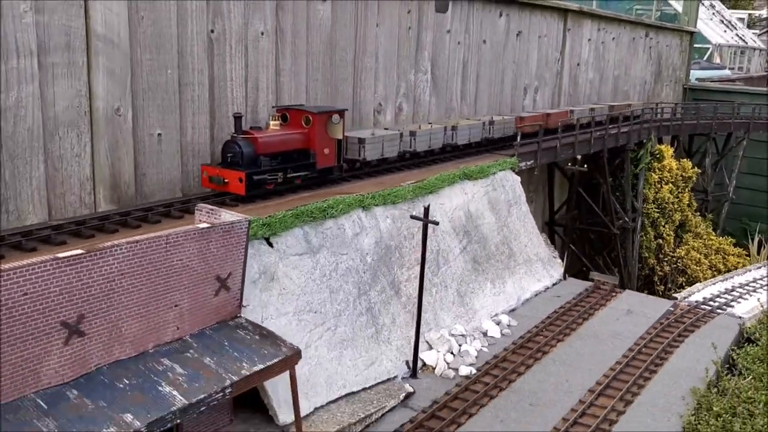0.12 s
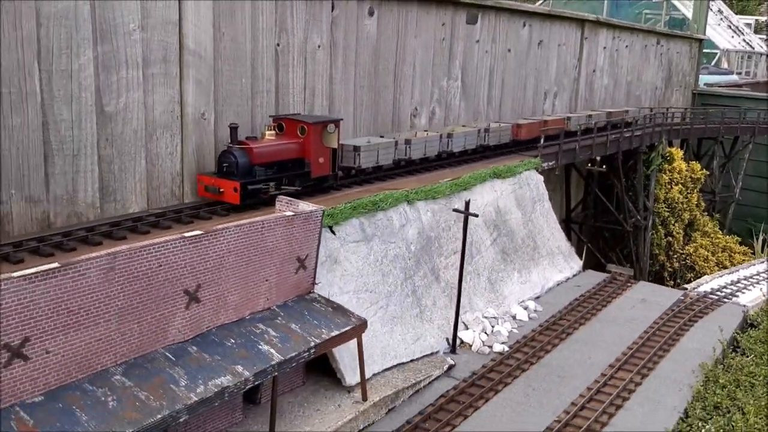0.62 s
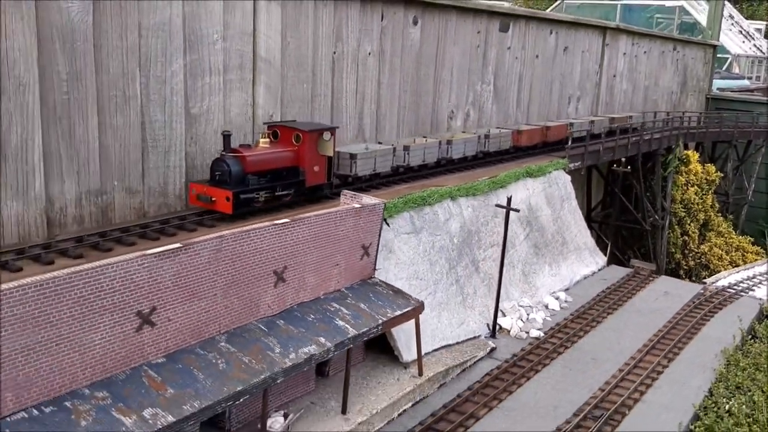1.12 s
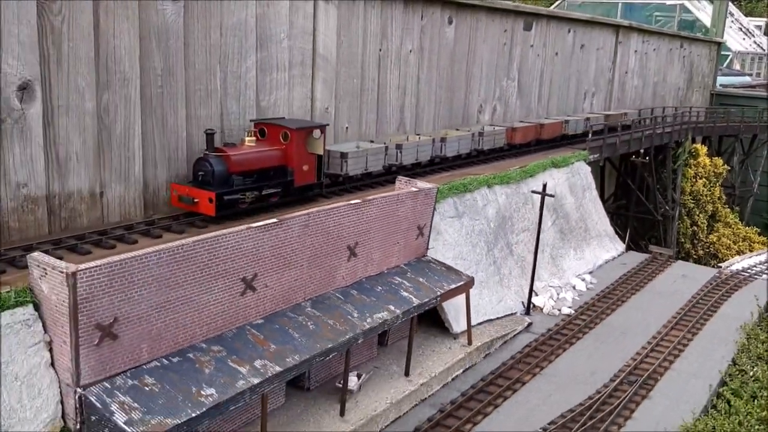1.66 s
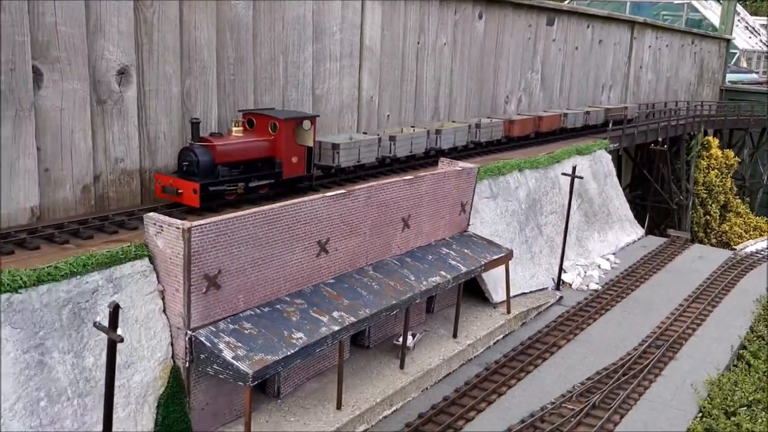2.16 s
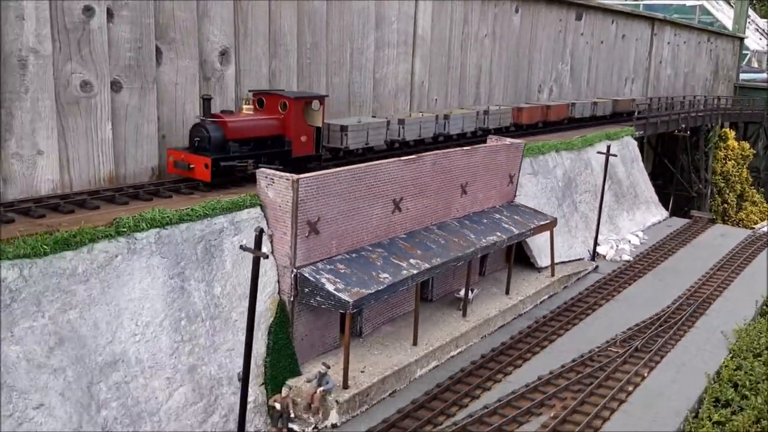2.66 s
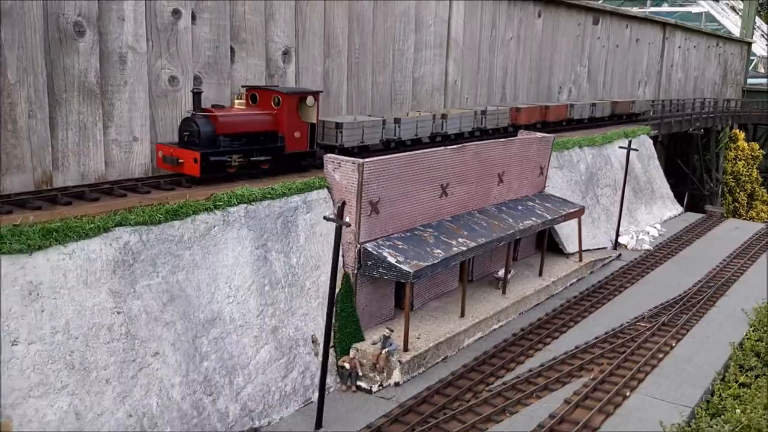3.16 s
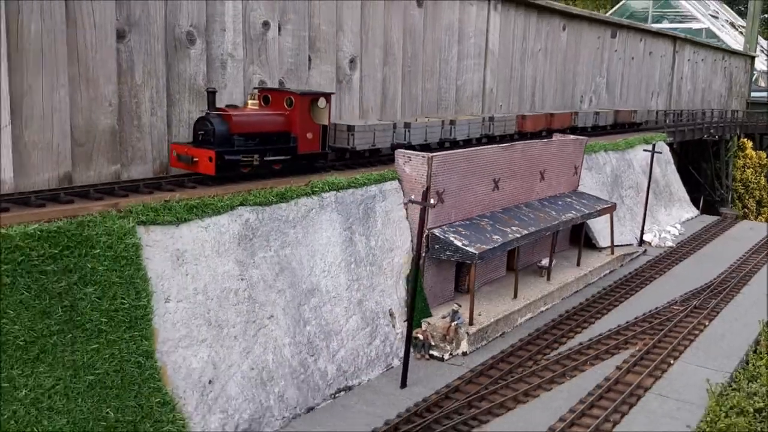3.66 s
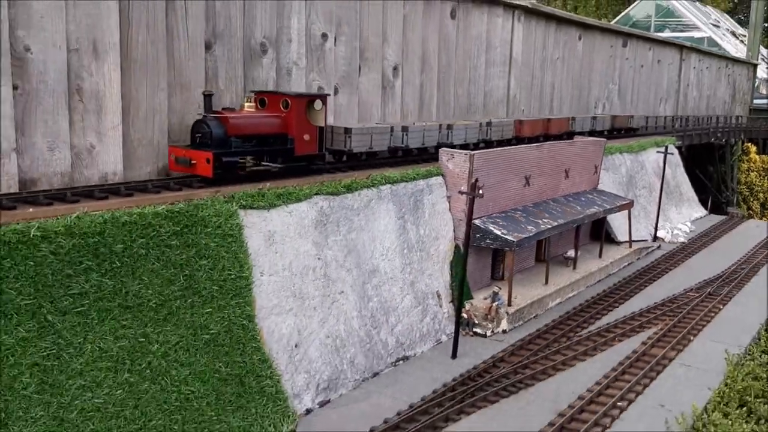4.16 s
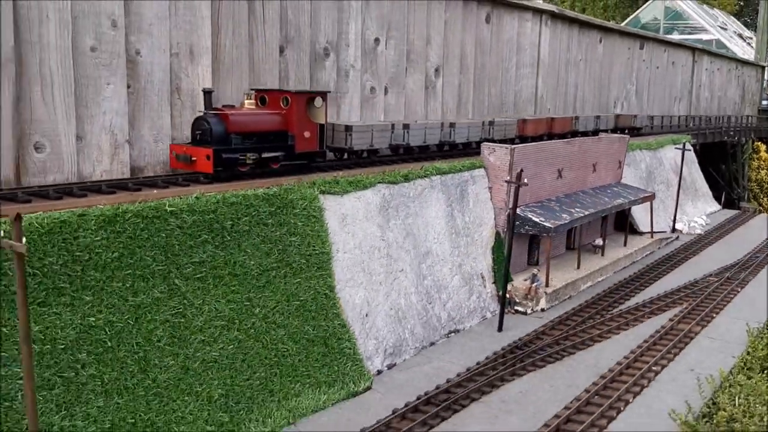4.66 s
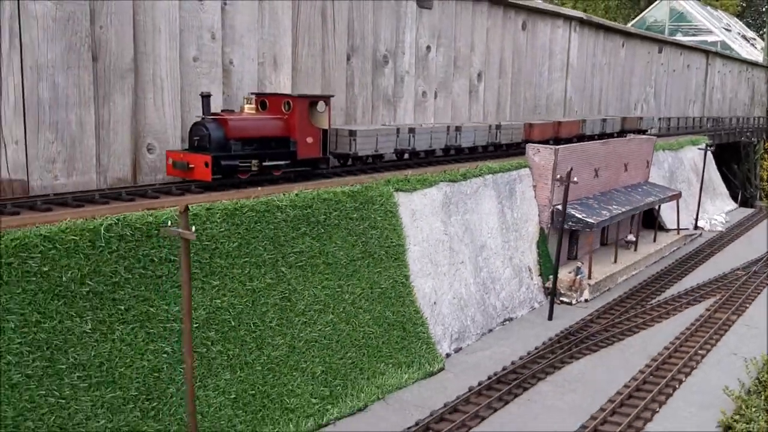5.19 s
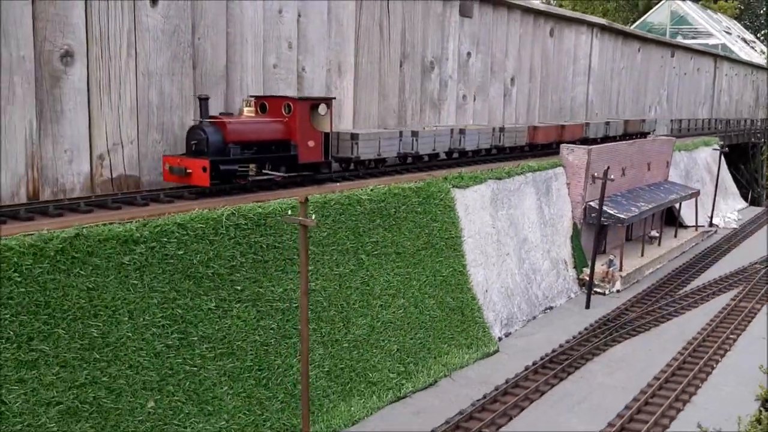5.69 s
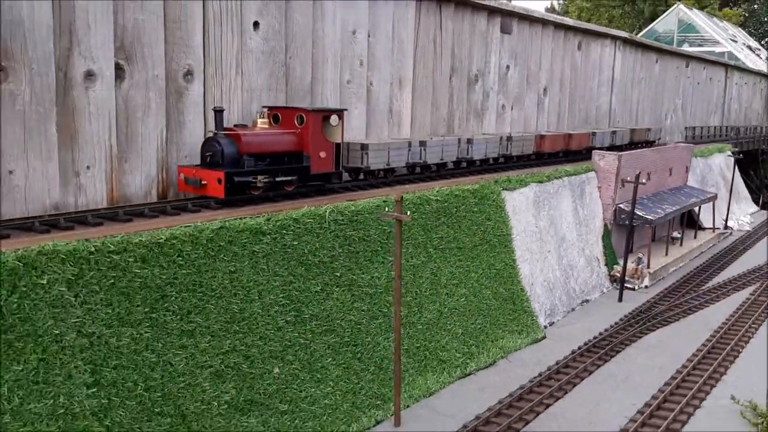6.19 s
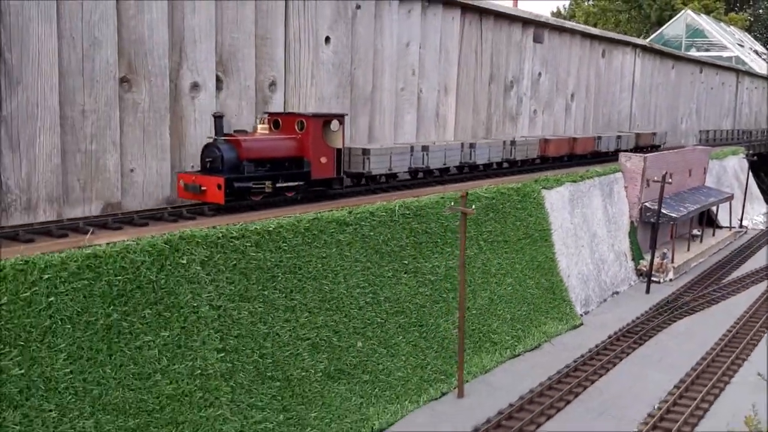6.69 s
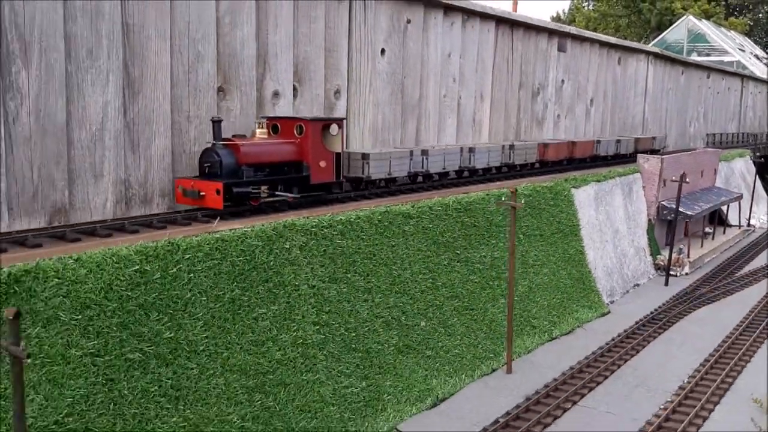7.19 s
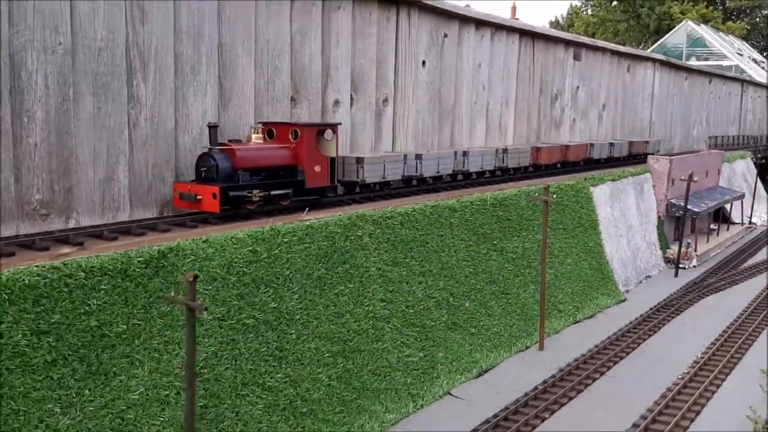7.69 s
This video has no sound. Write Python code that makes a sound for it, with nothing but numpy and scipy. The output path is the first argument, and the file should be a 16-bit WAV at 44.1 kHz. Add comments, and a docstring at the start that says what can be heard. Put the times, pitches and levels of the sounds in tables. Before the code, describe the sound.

Close outdoor stereo sound from a hand-held camera following a miniature live-steam engine along a fence. From 0 to 7.8 seconds a bright, very high steam and gas hiss stays nearly constant, slightly grainy, with subtle sweeping streaks and brief dips, notably near 6 and 7.5. Rapid soft exhaust puffs, about thirteen per second, flutter beneath it, a little stronger around 2, 3.6 and 5.5. A faint hollow burner roar and low wagon rumble continue underneath. A distant vehicle's tyre roar swells near 0.9, falls slightly in pitch and fades by about 2.7. Soft low thumps over rail joints cluster at 1.4 to 2.3, then come singly or in pairs, clearer near 4.9, 5.7 and 6.2. Light wind bumps appear around 3 to 4.4; from 6.3 deep uneven buffeting shifts between left and right, peaking around 6.9 to 7.3. It ends mid-run.

```python
"""Garden railway: a small live-steam locomotive runs along the line, followed by a hand-held camera.
Gas jet and leaking steam hiss (banded noise, streaked by echoes off a fence); the flame roars in the flue
(noise through tube modes); exhaust beats puff four to a wheel turn (noise pulses ringing the chimney).
Wagons rumble and thump over rail joints (noise, decaying sines), a far vehicle passes (noise on a falling
pitch), and wind buffets the two microphone ports (low noise, short low-pitched gusts)."""
import sys
import numpy as np
from scipy import signal
from scipy.fft import rfft, irfft, next_fast_len
from scipy.io import wavfile
from scipy.ndimage import uniform_filter1d, map_coordinates

SR = 44100
rng = np.random.default_rng(int(sys.argv[2]) if len(sys.argv) > 2 else 0)


def field_ratio(decibels):
    """Amplitude ratio for a level in dB (20 dB per decade); scalars and array-likes work."""
    return 10 ** (np.asarray(decibels, dtype=float) / 20)


def log_audio(samples):
    """Write samples as a 16-bit WAV file to the path given in sys.argv[1]."""
    # one column per channel
    frames = np.atleast_2d(samples).T
    # limit to full scale, then quantise
    limited = np.clip(frames, -1, 1)
    pcm = np.round(limited * 32767).astype(np.int16)
    wavfile.write(sys.argv[1], SR, pcm)


N = 345303  # samples


def unit(x):
    """Scaled to rms 1."""
    return x / np.sqrt(np.mean(x ** 2) + 1e-20)


def along(points, hz):
    """Every column after the frequency, read on a log axis."""
    f, *cols = np.transpose(points)
    return np.squeeze([np.interp(np.log(hz + 1), np.log(f + 1), c) for c in cols])


def curves(rows):
    """One value per sample for each column after the time."""
    s, *cols = np.transpose(rows)
    return [np.interp(np.arange(N) / SR, s, c) for c in cols]


def wobble(knots_per_s):
    """A smooth random curve through normal random knots."""
    knots = rng.standard_normal(int(N * knots_per_s / SR) + 4)
    return map_coordinates(knots, [np.arange(N) * knots_per_s / SR])


def patches(shape, wide, long):
    """A random field of rms 1, smooth over wide rows and long columns."""
    field = uniform_filter1d(rng.standard_normal(shape), wide, -2)
    return unit(uniform_filter1d(field, long, -1))


def filtered(x, response):
    """x times a complex response of frequency."""
    m = next_fast_len(N + 8192)
    return irfft(rfft(x, m) * response(np.fft.rfftfreq(m, 1 / SR)), m)[..., :N]


def ring(noise, table, sharpness):
    """Noise through a pipe's resonances, alternate in sign; sharpness deepens the valleys between them."""
    def response(f):
        total = 0
        for k, (centre, width, left_db, right_db) in enumerate(table):
            mode = 1j * f * width / (centre * centre - f * f + 1j * f * width)
            total = total + (-1) ** k * field_ratio([[left_db], [right_db]]) * mode
        return total * np.abs(total) ** sharpness
    return unit(filtered(noise, response))


# Likeness of the two ports. Each row: frequency in Hz, likeness 0 to 1.
PORT_LIKENESS = [(50, 0.9), (200, 0.84), (500, 0.76), (1050, 0.27), (1550, 0.52), (1900, 0.97), (2500, 0.8),
                 (2850, 0.16), (3300, 0.29), (3800, 0.74), (4800, 0.58), (5600, 0.53), (7500, 0.2),
                 (10000, 0.15), (15000, 0)]
# Phase lead of the left port. Each row: frequency in Hz, lead in radians.
LEFT_LEAD = [(30, -0.5), (520, 0.65), (1000, 1), (1640, 2), (1980, 1), (2500, 0.93), (3530, 3.5), (5600, 4),
             (8790, 6.5), (10900, 6), (13000, 7.5), (16000, 10)]


def air(patchy_db, wide=8, long=12):
    """White noise at two ports: partly alike, offset in phase, in time-frequency patches of random gain."""
    z = signal.stft(rng.standard_normal((2, N)), nperseg=512)[2]
    gain_db = patchy_db * patches(z.shape[1:], round(wide), round(long))
    pair = signal.istft(z * field_ratio(gain_db), nperseg=512)[1][:, :N]

    def shares(hz):
        angle = np.arccos(np.clip(along(PORT_LIKENESS, hz), 0, 1)) / 2
        return np.array([np.cos(angle), np.sin(angle)])
    mid, side = filtered(pair, shares)
    ports = np.array([mid + side, mid - side])
    return filtered(ports, lambda hz: np.exp(.5j * along(LEFT_LEAD, hz) * [[1], [-1]]))


# Fence planks passed, one echo phase turn each. Each row: time in seconds, left count, right count.
PLANK_COUNT = [(0, 0.8, 0.6), (.29, 2.06, 1.71), (.73, 3.79, 2.87), (1.16, 5.73, 4.25), (1.6, 7.73, 6.36),
               (2.03, 9.78, 8.49), (2.47, 11.41, 10.4), (2.9, 13.32, 12.28), (3.34, 15.56, 14.11),
               (3.77, 17.93, 15.86), (4.21, 19.76, 17.51), (4.64, 21.41, 19.18), (5.08, 23.25, 20.94),
               (5.51, 24.98, 22.51), (5.95, 26.8, 24.32), (6.39, 28.65, 26.14), (6.82, 30.58, 28.26),
               (7.26, 32.44, 30.14), (7.83, 34.85, 32.55)]
ECHO_DELAY_S, ECHO_HZ = [[.0003], [.00045]], 13700  # left and right delay; where the count is read
ECHO_SHARE = .26  # echo over direct hiss


def fence(x):
    """A close echo turns in phase plank by plank: bright and dull streaks sweep down the hiss."""
    f, t, z = signal.stft(x, SR, nperseg=256)
    s, *counts = np.transpose(PLANK_COUNT)
    planks = np.array([np.interp(t, s, c) for c in counts])[:, None]
    turns = planks + (ECHO_DELAY_S * (f - ECHO_HZ))[..., None]
    comb = np.abs(1 + ECHO_SHARE * np.exp(2j * np.pi * turns))
    return signal.istft(z * comb, SR, nperseg=256)[1][:, :N]


# Hiss spectrum at each port. Each row: frequency in Hz, left in dB, right in dB.
JET_COLOUR = [(2880, -26, -18), (3650, -16, -14.5), (4200, -14.5, -16), (5100, -13, -15.5),
              (5700, -15, -10.5), (6530, -14.5, -18), (7400, -11, -15.5), (8090, -13.5, -17.5),
              (8220, -23.5, -22), (9190, -10.5, -20), (10370, -9.5, -11), (11280, -6.5, -11),
              (12100, -4, -7), (12800, -2, -1), (13600, -0.5, 0.5), (14600, -1.5, -2), (15200, -3, -2.5),
              (15700, -3, -1)]
# Brief flares and lulls. Each row: centre in seconds, swing in dB, half width in seconds.
JET_FLARES = [(.34, 2.5, 0.019), (1.26, 0.5, 0.016), (1.49, -2, 0.0096), (2.87, 1.5, 0.046),
              (3.7, -3, 0.032), (3.98, 2, 0.027), (4.11, -3, 0.036), (4.62, -3, 0.0086), (4.94, 1, 0.025),
              (5.67, -2, 0.022), (5.79, 4.5, 0.013), (5.95, -4, 0.038), (6.08, -1, 0.032),
              (6.14, -5, 0.012), (7.42, 1.5, 0.065), (7.52, -8, 0.021), (7.6, 1, 0.032)]
# Jet's duller side toward the camera. Each row: time in seconds, low band change in dB.
JET_FACING = [(0, -0.5), (.45, -5), (.8, -1), (1.7, 1.5), (2.2, 1), (2.7, -2.5), (3.0, 0.5), (3.9, -1.5),
              (5, -1), (5.7, 1), (6.1, -1.5), (6.8, 0.5), (7.83, -1.5)]
JET_DB = -25  # steady top band
MIDDLE_DB, LOW_DB = -12.5, -13.5  # under the top band
MIDDLE_FOLLOWS, LOW_FOLLOWS = 1, 0.15  # share of the flares
MIDDLE_TURNS = 0.14  # share of the facing


def hiss():
    """Jet turbulence noise; its three bands swell apart as engine and camera move."""
    t, facing_db = np.arange(N) / SR, curves(JET_FACING)[0]
    swing_db = sum(db * np.exp(-.5 * ((t - s) / width_s) ** 2) for s, db, width_s in JET_FLARES)
    streaky = fence(air(patchy_db=1.31, wide=14.1, long=6))
    jet = filtered(streaky, lambda hz: field_ratio(along(JET_COLOUR, hz)) * (hz > 2600))

    def above(hz, edge_hz):
        return .5 + .5 * np.tanh((hz - edge_hz) / 500)
    low = filtered(jet, lambda hz: 1 - above(hz, 8600))
    top = filtered(jet, lambda hz: above(hz, 12000))
    middle = jet - low - top
    top_db = swing_db + 0.76 * wobble(22)
    middle_db = MIDDLE_DB + MIDDLE_FOLLOWS * swing_db + MIDDLE_TURNS * facing_db + 0.77 * wobble(9)
    low_db = LOW_DB + LOW_FOLLOWS * swing_db + facing_db + 1.33 * wobble(9)
    bands = field_ratio(top_db) * unit(top) + field_ratio(middle_db) * unit(middle) + field_ratio(low_db) * unit(low)
    return field_ratio(JET_DB + 0.66 * wobble(17)) * bands


# Flame strength. Each row: time in seconds, level in dB.
FLAME_LEVEL = [(0.0, -55.5), (0.41, -56), (0.48, -55.5), (2.97, -55), (7.81, -53.5), (7.83, -54)]
# Flue tube modes, low then high. Each row: centre in Hz, width in Hz, left in dB, right in dB.
LOW_FLUE_MODES = [(507, 165, -3.5, -4.5), (743, 150, -3, -4.5), (994, 112, -1.5, -0.5)]
HIGH_FLUE_MODES = [(1555, 133, 1.5, 2.5), (2036, 139, -2.5, -4), (2446, 390, -5.5, -7.5),
                   (2990, 180, -7.5, -3.5)]
LOW_FLUE_DB, HIGH_FLUE_DB = 6, 7  # over the flame level


def flame():
    """Flame turbulence excites the flue tube modes; the low ones hold the mean level."""
    level_db, = curves(FLAME_LEVEL)
    low = ring(air(patchy_db=1.94, wide=3, long=8), LOW_FLUE_MODES, 0.087)
    high = ring(air(patchy_db=0.87, wide=3, long=8), HIGH_FLUE_MODES, 0.15)
    return field_ratio(level_db.mean() + LOW_FLUE_DB) * low + field_ratio(level_db + HIGH_FLUE_DB) * high


# Wheel motion. Each row: time in seconds, exhaust beats counted so far.
WHEEL_BEATS = [(0, .35), (0.398, 5.56), (0.951, 12.94), (1.502, 20.97), (2.0, 27.98), (2.5, 34.93),
               (3.4, 46.76), (4.201, 57.01), (4.799, 64.86), (5.397, 72.92), (7.1, 95.54), (7.55, 101.42),
               (7.83, 105.17)]
# Four strokes of a wheel turn. Each row: delay in seconds, chimney modes in dB, overtones in dB.
STROKE_OFFSETS = [(-0.002, 2, 7), (-0.002, 0, 6.5), (-0.002, -0.5, 5.5), (-0.002, 2, 6.5)]
# Engine effort; lower chimney mode strong at the start, faint until 2.2 s, then back.
# Each row: time in seconds, beat level in dB, lower chimney mode over the beat in dB.
ENGINE_EFFORT = [(0, -48.5, 6), (1, -46, -17), (2.2, -43, -26), (2.7, -48, -0.5), (3.6, -41.5, -7),
                 (4.4, -45, -11), (5.5, -41.5, -6), (6.6, -44, -3.5), (7.83, -42, -7)]
# Chimney modes, lower chimney mode, overtones.
# Each row: centre in Hz, width in Hz, left in dB, right in dB.
CHIMNEY_MODES = [(2618, 340, -2, 2), (3010, 415, -6, 0)]
LOWER_CHIMNEY_MODE = [(2300, 190, 5.5, 3)]
OVERTONE_MODES = [(1533, 146, 1.6, 3), (4160, 1010, 2.6, -2.5), (5070, 610, 5.2, 6), (10980, 790, 7.8, 0.5)]
CHIMNEY_TRIM_DB, OVERTONE_TRIM_DB = -1.5, 1.0
OVERTONES_FOLLOW = 0.39  # share of the effort's swings
BEAT_SCATTER_S, BEAT_SCATTER_DB = 0.0025, 1.6
BETWEEN_DB = -13.5  # steam between beats, under their peak
BEATS_PER_S = 13.3  # mean


def exhaust():
    """Each beat is a soft puff of steam that rings the chimney, over steam that keeps blowing."""
    when, counted = np.transpose(WHEEL_BEATS)
    beat = np.arange(np.ceil(counted[0]), counted[-1]).astype(int)
    late_s, stroke_db, over_db = np.array(STROKE_OFFSETS)[beat % len(STROKE_OFFSETS)].T
    chance = rng.standard_normal((len(beat), 4))
    beat_s = np.interp(beat, counted, when) + late_s + BEAT_SCATTER_S * chance[:, 0]
    at = np.clip(beat_s * SR, 0, N - 1).astype(int)
    effort_db, lower_db = [c[at] for c in curves(ENGINE_EFFORT)]
    mean_db = effort_db.mean()
    first_db = effort_db + stroke_db
    over_db = over_db + mean_db + OVERTONES_FOLLOW * (effort_db - mean_db)
    sizes = np.zeros((3, N))
    sizes[:, at] = field_ratio([first_db, first_db + lower_db, over_db] + BEAT_SCATTER_DB * chance[:, 1:].T)
    t = np.arange(-2000, 2001) / SR
    puff = np.exp(-.5 * (t / np.where(t < 0, .008, .007)) ** 2)
    puffs = signal.fftconvolve(sizes, puff[None], "same", axes=1)
    between = field_ratio(BETWEEN_DB) * uniform_filter1d(sizes, SR // 4, axis=1) * SR / BEATS_PER_S
    first, lower, over = puffs + between
    chimney, lower_chimney, overtones = [ring(air(patchy_db=0.5), table, 0.069)
                                         for table in (CHIMNEY_MODES, LOWER_CHIMNEY_MODE, OVERTONE_MODES)]
    body = field_ratio(CHIMNEY_TRIM_DB) * (first * chimney + lower * lower_chimney)
    return body + field_ratio(OVERTONE_TRIM_DB) * over * overtones


# Rolling spectrum. Each row: frequency in Hz, relative density in dB per Hz.
ROLLING_COLOUR = [(35, -48), (60, -10.5), (189, 1), (277, -3), (406, -0.5), (564, -17.5), (1020, -8),
                  (1400, -3.5), (1820, -55), (3080, -120)]
# Wheels over rail joints. Each row: start in seconds, level in dB before trim and attack, deck pitch in Hz.
JOINT_THUMPS = [(1.357, -31, 109), (1.83, -28, 137), (1.919, -31, 173), (2.062, -27.5, 141),
                (2.25, -25.5, 165.8), (2.782, -34, 199), (3.566, -37, 193), (4.646, -32, 132),
                (4.705, -36, 129), (4.905, -26.5, 128), (5.321, -30, 139), (5.577, -32, 156),
                (5.677, -26.5, 133), (6.214, -28, 125), (6.647, -32.5, 157), (7.807, -39, 128)]
ROLLING_DB, THUMP_TRIM_DB = -50, -0.5
THUMP_T60_S, THUMP_ATTACK_S = 0.075, 0.014


def wagons():
    """Wheels rumble on the rails; the raised track deck thumps at each joint as a decaying sine."""
    rumble = unit(filtered(air(patchy_db=2.0), lambda hz: field_ratio(along(ROLLING_COLOUR, hz))))
    rolling = field_ratio(ROLLING_DB + 1.4 * wobble(11)) * rumble
    deck, t = np.zeros(N + SR), np.arange(SR // 4) / SR
    for s, db, hz in JOINT_THUMPS:
        decay = field_ratio(db + THUMP_TRIM_DB - 60 * t / THUMP_T60_S)
        attack = 1 - np.exp(-t / THUMP_ATTACK_S)
        deck[round(s * SR):][:len(t)] += decay * attack * np.sin(2 * np.pi * hz * t)
    return rolling + deck[:N]


# Far vehicle's tyre roar. Each row: time in seconds, pitch in Hz, level in dB.
TYRE_ROAR = [(0, 1120, -56), (.45, 1111, -54), (.6, 1049, -48.5), (.9, 990, -46.5), (1.2, 953, -48),
             (1.6, 916, -55.5), (2.1, 910, -51), (2.7, 880, -61), (3.3, 877, -74), (7.83, 885, -62)]
TRAFFIC_LEFT_DB = 2  # added left, taken off right


def traffic():
    """Tyre roar: slow noise carried on a pitch that sinks as the vehicle passes."""
    hz, db = curves(TYRE_ROAR)
    slow = filtered(rng.standard_normal((2, 2, N)), lambda f: 1 / (1 + (f / 90) ** 2))
    phase = 2 * np.pi * np.cumsum(hz) / SR
    roar = unit(slow[0] * np.cos(phase) + slow[1] * np.sin(phase))
    return field_ratio(db + TRAFFIC_LEFT_DB * np.array([[1], [-1]])) * roar


# Breeze strength. Each row: time in seconds, level in dB.
BREEZE = [(0, -75), (.6, -66), (1, -72), (2.6, -80), (3.1, -55), (4.4, -62), (4.8, -64), (5.9, -62),
          (6.1, -66), (6.3, -61), (6.7, -51), (6.9, -46.5), (7.3, -50), (7.5, -58), (7.83, -54)]
# Buffeting spectrum. Each row: frequency in Hz, relative density in dB per Hz.
BUFFET_COLOUR = [(12, -48), (24, -14), (44, -5), (65, -7), (108, -14), (190, -15.5), (250, -30), (320, -54),
                 (550, -120)]
# Gusts at the ports. Each row: time in seconds, level in dB before trim, pitch in Hz,
# left over right in dB before the limit.
PORT_GUSTS = [(0.519, -53, 108, -2), (0.799, -57, 75.4, 4.5), (1.129, -47, 107.9, 1),
              (2.089, -53, 78.6, -10), (2.509, -67, 77.9, 14.5), (2.919, -50, 80.7, 4.0),
              (3.118, -53, 110, 11.5), (3.289, -46, 45.4, 33.5), (3.659, -45, 61, 14.0),
              (3.779, -48.5, 92, 21), (4.249, -53, 68, 24.0), (4.389, -48, 43, 2), (5.279, -50, 108, -4),
              (6.319, -44.5, 72.7, 4), (6.468, -48, 91.5, 3), (6.569, -50, 59.2, -1.5),
              (6.82, -43, 67.3, 19), (6.869, -38, 64.6, -16), (7.058, -41, 73, 21), (7.129, -40, 48.4, 11),
              (7.179, -37, 67, -8), (7.249, -45, 81.5, -12), (7.329, -43, 83, -13),
              (7.509, -44.5, 86.1, -2), (7.659, -45, 91.5, 2), (7.799, -46, 63.6, -18.5)]
GUST_TRIM_DB, GUST_PAN_LIMIT_DB = -2.5, 15
GUST_DELAY_S, GUST_HALF_WIDTH_S = 0.012, 0.015


def wind():
    """Turbulence buffets each port in lumps; single gusts push the ports unequally for a few cycles."""
    buffeting = filtered(rng.standard_normal((2, N)), lambda hz: field_ratio(along(BUFFET_COLOUR, hz)))
    lumps = field_ratio(0.9 * wobble(8.7) + 3.3 * np.array([wobble(9.6), wobble(11)]))
    breeze = field_ratio(curves(BREEZE)[0] + 2.4 * wobble(11)) * unit(lumps * buffeting)
    t, strikes = np.arange(N) / SR, np.zeros((2, N))
    for s, db, hz, pan_db in PORT_GUSTS:
        pan_db = np.clip(pan_db, -GUST_PAN_LIMIT_DB, GUST_PAN_LIMIT_DB)
        level = field_ratio(db + GUST_TRIM_DB + pan_db * np.array([[.5], [-.5]]))
        swell = np.exp(-.5 * ((t - s - GUST_DELAY_S) / GUST_HALF_WIDTH_S) ** 2)
        strikes += level * swell * np.cos(2 * np.pi * hz * (t - s) + rng.uniform(0, 2 * np.pi))
    return breeze + strikes


def scene():
    """All sources at the two ports."""
    return hiss() + flame() + exhaust() + wagons() + traffic() + wind()


# Cancellations in the camera's housing. Each row: Hz ahead, Hz abreast, width in Hz, left depth ahead in dB,
# right depth ahead in dB, ratio of depth abreast to ahead.
HOUSING_NOTCHES = [(597, 763, 55, 7, 5, 0.26), (1270, 1337, 88, 1.5, 2, 0.9), (1930, 1882, 89, 2, 3, 3.95),
                   (2223, 2126, 58, 6.5, 14, 0.27), (2794, 2783, 59, 5.5, 10.5, 1.1),
                   (3710, 3620, 59, 0.5, 11.5, 0.87), (5950, 6800, 140, 1, -2, 1.1),
                   (8540, 8830, 254, 3, 20, 0.38), (10400, 11200, 110, 2, 7, 0.92),
                   (11560, 11040, 250, 0, 8, 0.37), (13300, 13000, 600, 4.5, 2.5, 0.1),
                   (15000, 14600, 190, -2, 3, 2.1)]
# Engine's bearing. Each row: time in seconds, 0 ahead of the camera to 1 abreast.
ENGINE_BEARING = [(0, 0.05), (2.2, 0.12), (2.5, 0.59), (5, 0.85), (7.83, 0.94)]
# Left treble hollow that wanders as the camera turns. Each row: time in seconds, centre in Hz, depth in dB.
LEFT_HOLLOW = [(0, 15200, 3), (.9, 14100, 4), (1.8, 15450, 6), (2.8, 14400, 7), (3.9, 14900, 3.5),
               (5, 14700, 12), (6, 14600, 5), (7.2, 15000, 5), (7.83, 15200, 1)]
HOLLOW_WIDTH_HZ = 460
WAVER = 0.008  # share by which the hand-held camera shifts the notches
RIPPLE_DB = 1.2


def housing(x):
    """Notches move with the engine's bearing; narrow ripples drift slowly as reflections shift."""
    f, t, z = signal.stft(x, SR, nperseg=1024)
    hz = f[:, None]
    at = np.clip((t * SR).astype(int), 0, N - 1)
    bearing, waver = curves(ENGINE_BEARING)[0][at], 1 + WAVER * wobble(4.5)[at]
    dips_db = 0
    for ahead, abreast, width, left_db, right_db, ratio in HOUSING_NOTCHES:
        centre = waver * (ahead + (abreast - ahead) * bearing)
        depth_db = np.array([left_db, right_db])[:, None, None] * (1 + (ratio - 1) * bearing)
        dips_db = dips_db + depth_db * np.exp(-.5 * ((hz - centre) / width) ** 2)
    hollow_hz, hollow_db = [c[at] for c in curves(LEFT_HOLLOW)]
    hollow = hollow_db * np.exp(-.5 * ((hz - hollow_hz) / HOLLOW_WIDTH_HZ) ** 2)
    dips_db = dips_db + [[[1]], [[0]]] * hollow
    gain = field_ratio(RIPPLE_DB * patches(z.shape, 9, 36) - dips_db)
    return signal.istft(z * gain, SR, nperseg=1024)[1][:, :N]


# Where weak frequencies drop out. Each row: frequency in Hz, mean threshold in dB over neighbouring sound.
DROPOUT_THRESHOLD = [(100, -21), (400, -4.5), (1000, -7), (1600, -4), (2200, -1.5), (3500, 4), (5000, -2),
                     (6500, 2.5), (8500, -0.5), (9200, -1), (10000, -6), (11400, -2), (12300, -8),
                     (13500, -11), (14800, -7), (16000, -10)]
THRESHOLD_WANDERS_DB = 4.5


def dropouts(x):
    """Weak frequencies beside louder neighbours drop out in patches."""
    f, _, z = signal.stft(x, SR, nperseg=2048)
    power = np.abs(z) ** 2 + 1e-20
    narrow, broad = uniform_filter1d(power, size=20, axis=1), uniform_filter1d(power, size=64, axis=1)
    around = np.abs(np.where(f[:, None] < 1300, narrow, broad))
    wander_db = THRESHOLD_WANDERS_DB * patches(z.shape[1:], 8, 2)
    threshold_db = along(DROPOUT_THRESHOLD, f)[:, None] + wander_db
    limit = around * field_ratio(2 * threshold_db)  # doubled: power
    return signal.istft(z / (1 + (limit / power) ** 4), SR, nperseg=2048)[1][:, :N]


def top_cut(x):
    """Nothing passes above the cut-off."""
    return signal.sosfilt(signal.butter(12, 17060, fs=SR, output="sos"), x)


TOP_HZ = 15750


def record(dry):
    """The scene through the camera's housing, cut above TOP_HZ, weak frequencies thinned out."""
    heard = filtered(housing(dry), lambda hz: hz < TOP_HZ)
    mix = dropouts(heard)
    return top_cut(mix)


dry = scene()
out = record(dry)
log_audio(out)
```